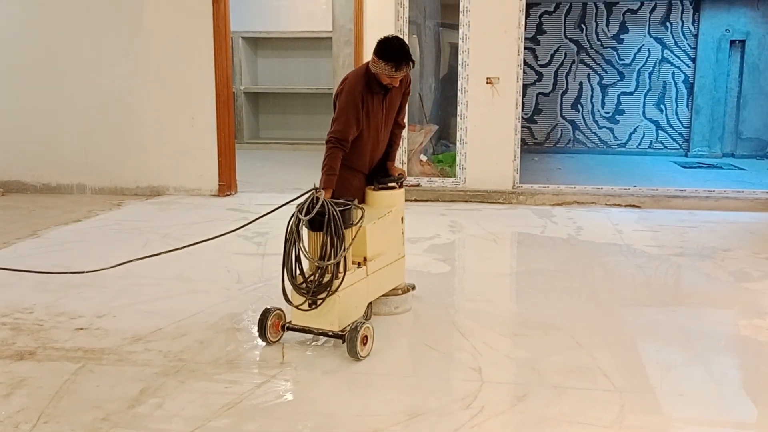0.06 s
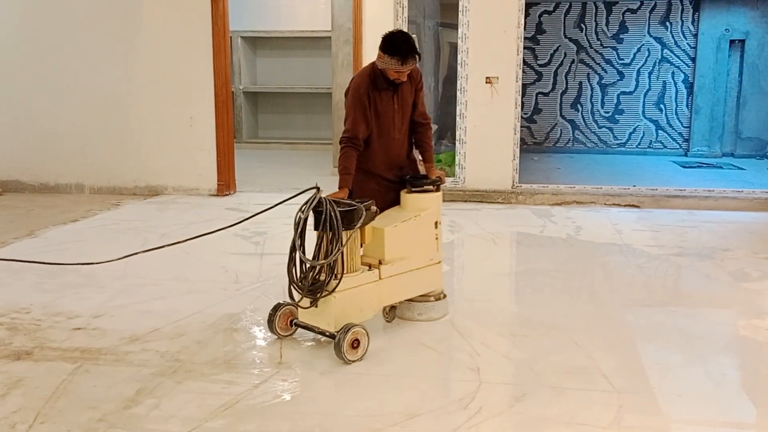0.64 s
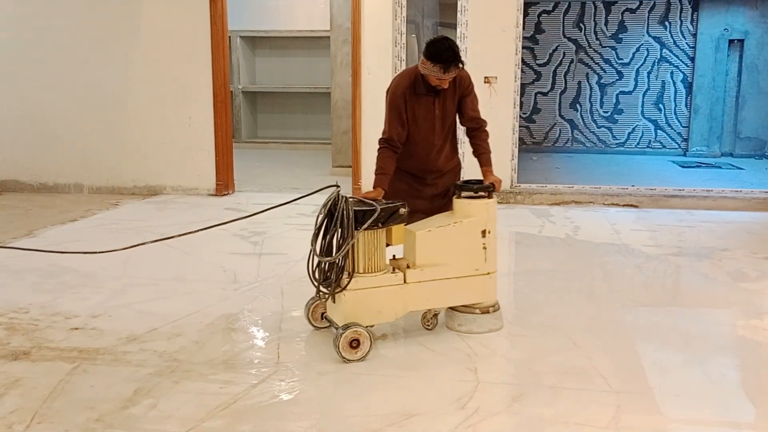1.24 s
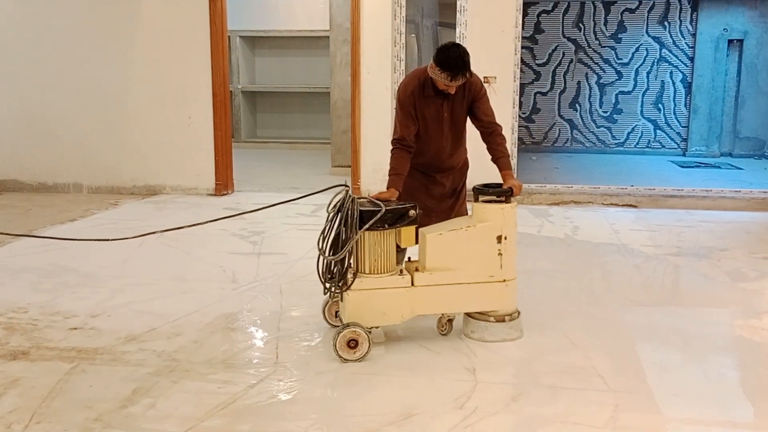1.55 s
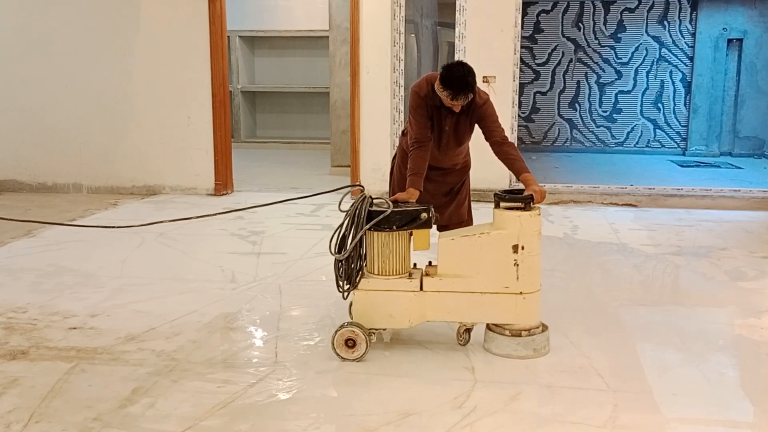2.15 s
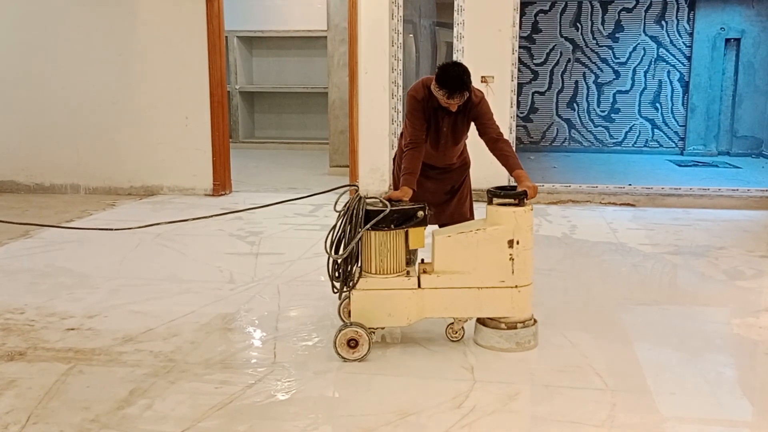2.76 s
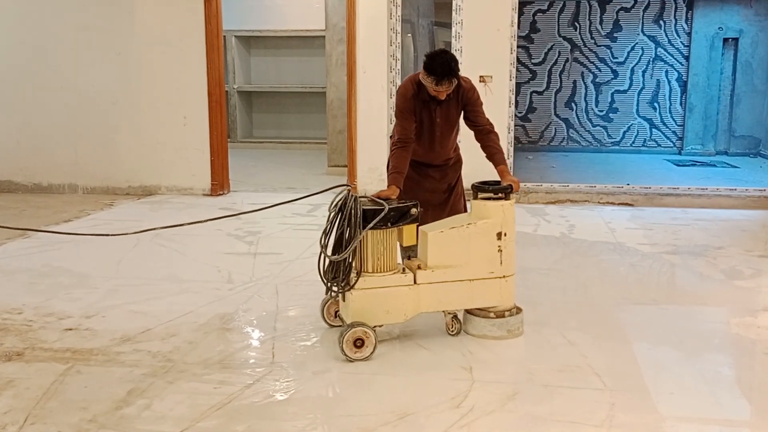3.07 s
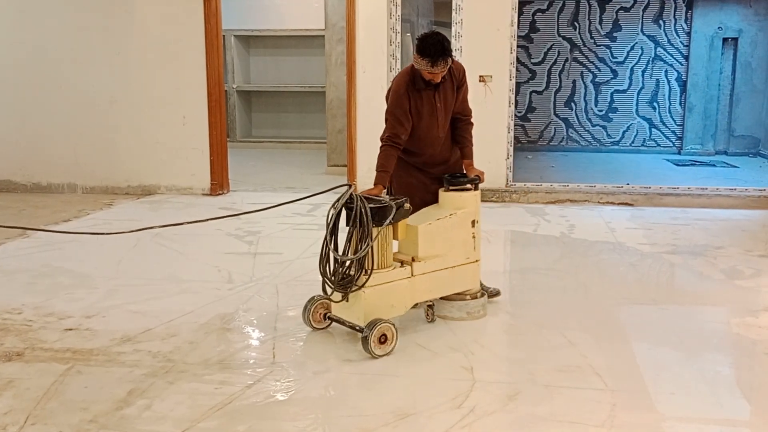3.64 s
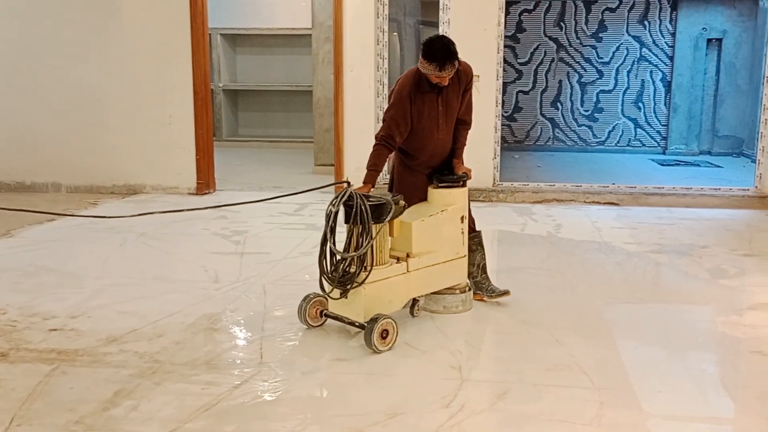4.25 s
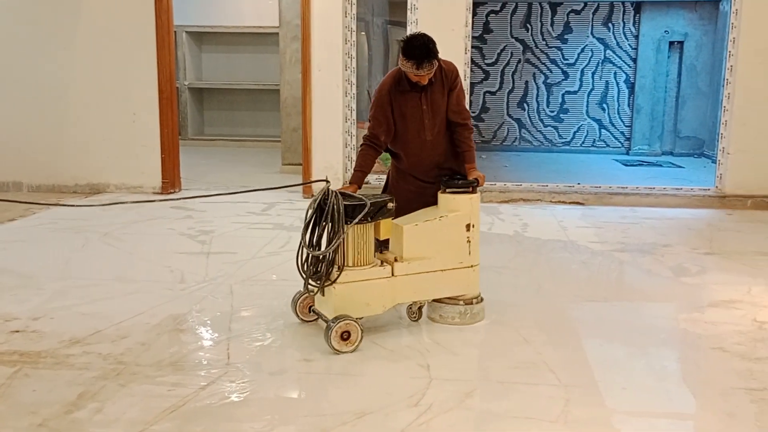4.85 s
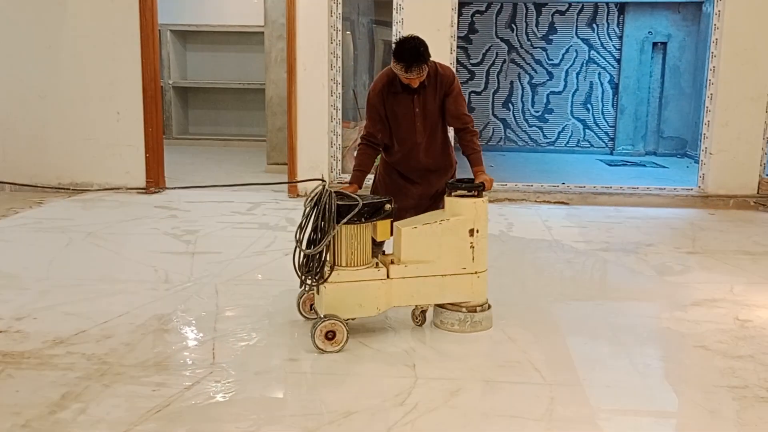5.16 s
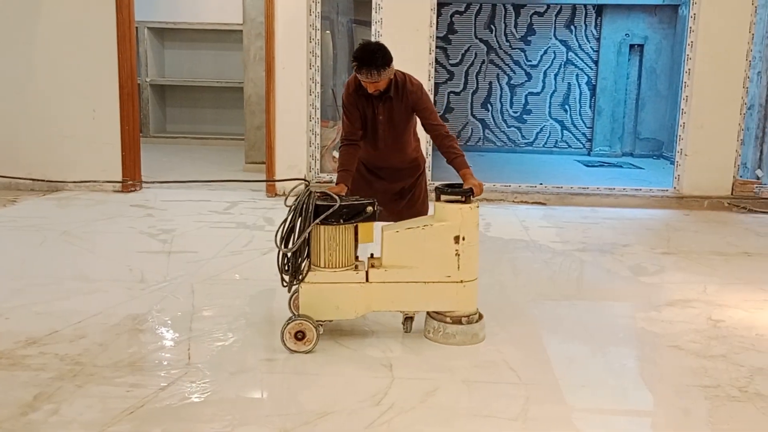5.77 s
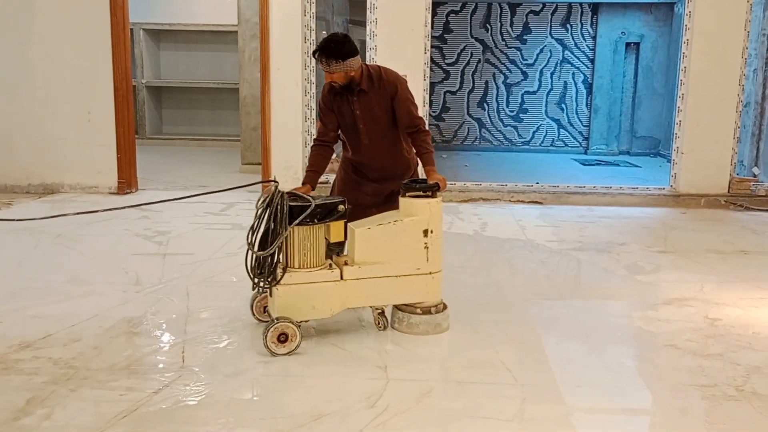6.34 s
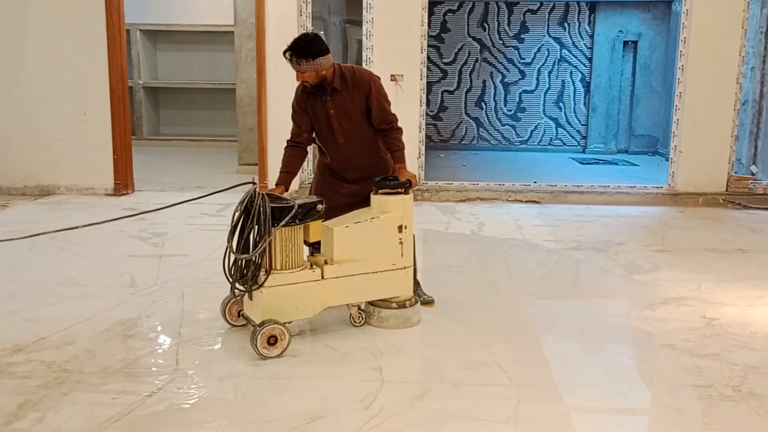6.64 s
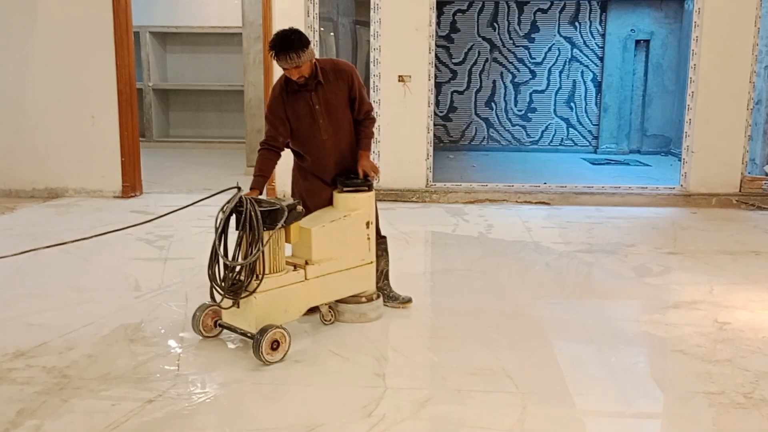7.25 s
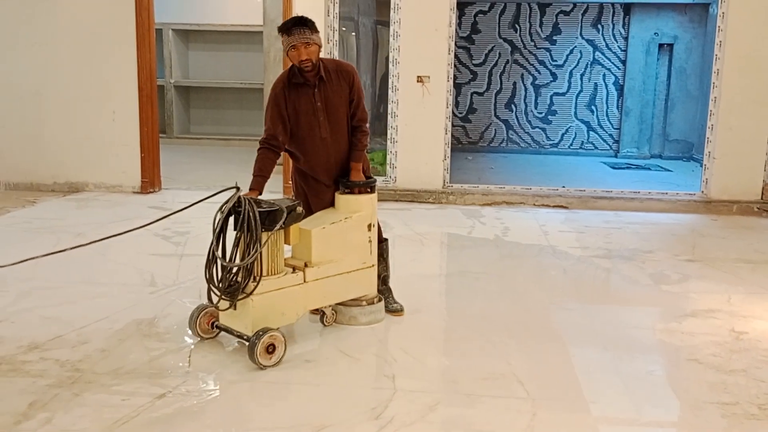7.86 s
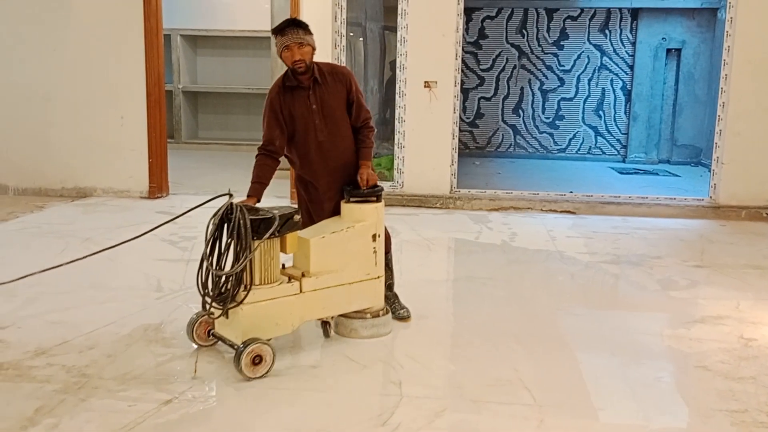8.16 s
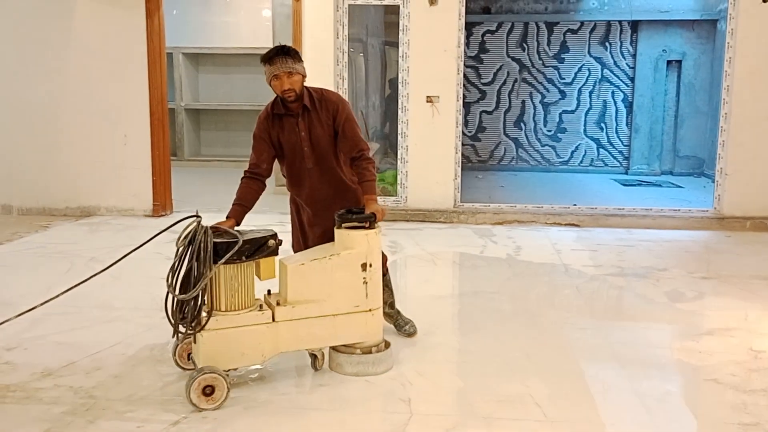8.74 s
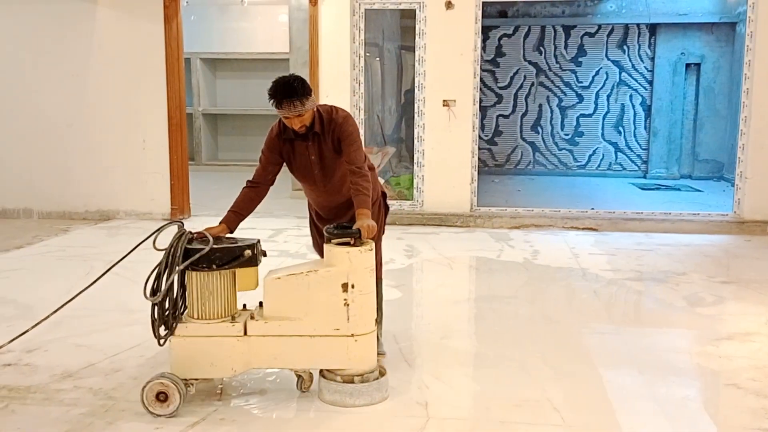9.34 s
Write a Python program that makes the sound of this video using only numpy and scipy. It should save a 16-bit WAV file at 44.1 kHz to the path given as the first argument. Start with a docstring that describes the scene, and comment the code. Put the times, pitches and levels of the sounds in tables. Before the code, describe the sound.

A heavy floor grinder drones and hums on wet stone, with a steady gritty rasp and a watery hiss.

```python
"""A heavy floor grinder is swung to and fro over wet stone in an empty building.
Stick-slip of the dragging stones shakes its sheet-steel casing into an uneven drone, and the belt
drive and gears hum at multiples of the shaft speed. Fracturing grit rubs, scrapes and rasps; the
slurry hisses. Now and then a stone catches and squeaks or rings. One microphone, a few metres away."""
import sys
import numpy as np
from scipy import signal
from scipy.fft import rfft, irfft
from scipy.io import wavfile
from scipy.ndimage import uniform_filter1d

SR = 44100
rng = np.random.default_rng(int(sys.argv[2]) if len(sys.argv) > 2 else 0)


def int16_out(signal):
    """Quantize to a 16-bit WAV file."""
    q = np.round(np.clip(np.atleast_2d(signal).T, -1, 1) * 32767)
    wavfile.write(sys.argv[1], SR, q.astype(np.int16))


N = 423360
TIME = np.arange(N) / SR
FREQS = np.maximum(np.fft.rfftfreq(N, 1 / SR), 1)


def from_db(db):
    """Decibels to gain."""
    return 10 ** (np.asarray(db) / 20)


def rms_one(x):
    """Scale to unit rms."""
    return x / np.sqrt(np.mean(x ** 2) + 1e-20)


def in_time(rows):
    """Interpolate each column of a timed curve to every sample."""
    times, *columns = np.transpose(rows)
    return [np.interp(TIME, times, column) for column in columns]


def bell(offset, half_width):
    """Gaussian of height 1, down to 1/e^2 at half_width."""
    return np.exp(-2 * (offset / half_width) ** 2)


def filtered(x, gain):
    """Apply a gain per frequency."""
    return irfft(rfft(x) * gain, N)


def coloured(x, spectrum):
    """Impose a spectrum, silent beyond its end points; rms 1."""
    hz, db = np.transpose(spectrum)
    gain_db = np.interp(np.log(FREQS), np.log(hz), db, left=-120, right=-120)
    return rms_one(filtered(x, from_db(gain_db)))


def resonate(x, modes):
    """Steep-sided resonances, each (Hz, width in Hz, relative dB); rms 1."""
    power = sum((from_db(db) / (1 + ((FREQS - hz ** 2 / FREQS) / width) ** 2)) ** 2
                for hz, width, db in modes)
    return rms_one(filtered(x, np.sqrt(power)))


def drift(rate_hz):
    """Smooth random wander; rms 1."""
    return rms_one(filtered(rng.standard_normal(N), 1 / (1 + (FREQS / rate_hz) ** 2)))


def grains(per_s, spread_db):
    """Grit fractures as random clicks of uneven size; rms 1."""
    born = rng.random(N) < per_s / SR
    sizes = from_db(spread_db * np.minimum(rng.exponential(1, N), 5))
    return rms_one(born * sizes * rng.choice([-1, 1], N))


def swells(starts, lengths, peaks_db, rest_db, attack_s=0.022, release_s=0.039):
    """Level in dB of a part that throbs under uneven grip and rises with each event."""
    coarse_time = TIME[::40]
    power = 0
    for start, length, db in zip(starts, lengths, peaks_db):
        end = start + length
        corners = [start - attack_s / 2, start + attack_s / 2, end - release_s / 2, end + release_s / 2]
        power += (from_db(db) * np.interp(coarse_time, np.sort(corners), [0, 1, 1, 0])) ** 2
    rest = from_db(rest_db + 2 * drift(rate_hz=43))
    return 10 * np.log10(rest ** 2 + np.interp(TIME, coarse_time, power))


def panel(part, level_db):
    """Stick-slip rattles a casing part; the harder it is shaken, the more its own note takes over."""
    note_hz, note_width_hz, rattle_hz, rattle_width_hz, share_db = part
    note = resonate(rng.standard_normal(N), [(note_hz, note_width_hz, 0)])
    note /= np.sqrt(uniform_filter1d(note ** 2, size=1400) + 0.038)  # friction sustains the swing
    rattle = resonate(grains(per_s=2500, spread_db=1.5), [(rattle_hz, rattle_width_hz, 0)])
    rattle /= np.sqrt(uniform_filter1d(rattle ** 2, size=2400) + 0.012)
    share = np.clip(from_db(share_db - 0.69 * (level_db - level_db.mean())), 0, 0.85)
    return from_db(level_db) * (np.sqrt(1 - share ** 2) * note + share * rattle)


# Casing parts. Each: note in Hz, its width in Hz, rattle in Hz, its width in Hz, rattle share in dB.
BOOM_PART = (142.5, 4.4, 147, 52, 1.3)
LOW_PART = (198, 6.2, 223, 71, 4.9)
LOOSE_PART = (266, 9, 256, 54, -6)
MAIN_PART = (303.5, 17, 326, 57, -2)
HIGH_PART = (405, 19.5, 392, 99, 2)
# Main panel at rest. Each row: time in seconds, level in dB.
DRONE_DB = [(0.0, -41), (2.75, -45.5), (4.81, -38), (5.91, -46), (6.09, -40), (8.53, -41.5), (8.58, -48),
            (8.62, -38.5), (9.6, -42.5)]
# Head stutters. Each row: start and length in seconds, boom and low panel levels in dB.
SHUDDER_EVENTS = [(0.21, 0.15, -42, -41.5), (0.47, 0.07, -48, -41.5), (0.693, 0.19, -49.5, -43),
                  (0.91, 0.11, -39.5, -43), (1.042, .06, -42, -45), (1.161, 0.043, -40.5, -32),
                  (1.26, 0.048, -49, -35.5), (1.435, 0.08, -43, -39.5), (1.81, 0.067, -39, -61),
                  (2.923, 0.18, -69, -43), (4.084, 0.1, -40.5, -48), (4.206, 0.049, -48, -44),
                  (4.327, 0.07, -36, -50), (4.424, .14, -33.5, -50), (4.57, 0.054, -52, -39.5),
                  (4.708, 0.18, -39, -47), (5, 0.14, -41, -41.5), (5.22, 0.088, -44, -46),
                  (5.503, 0.19, -66, -43), (5.868, 0.05, -42, -45), (6.01, 0.11, -43.5, -48),
                  (6.29, 0.047, -45, -41), (6.462, 0.11, -38.5, -52), (6.615, 0.12, -38.5, -48),
                  (7.503, 0.14, -66, -46), (7.728, 0.15, -47, -44.5), (8.134, 0.16, -74, -45.5),
                  (8.42, 0.13, -70, -42.5), (8.68, 0.17, -44.5, -57), (8.933, 0.058, -57, -39.5),
                  (9.088, 0.043, -40, -53), (9.39, 0.047, -44.5, -54)]
# Stone bites. Each row: start and length in seconds, loose, main and high panel levels in dB.
GROAN_EVENTS = [(0, 0.022, -34, -35, -47), (0.384, 0.038, -35, -36, -40), (0.453, 0.08, -42.5, -38, -49),
                (0.722, 0.13, -44, -35.0, -41), (0.912, 0.033, -54, -24.5, -40),
                (1.028, 0.16, -55, -34, -42), (1.29, 0.1, -52, -32.5, -50), (2.836, 0.27, -54, -40.5, -45),
                (3.587, 0.074, -59, -32, -57), (3.714, 0.083, -53, -32.5, -47),
                (4.196, 0.022, -39, -42, -39), (4.62, 0.22, -44, -37, -46), (5.065, 0.04, -49, -32, -58),
                (5.236, 0.03, -35, -33, -52), (5.286, 0.088, -37.5, -54, -58),
                (5.497, 0.27, -45.5, -55, -46), (5.9, 0.16, -38.5, -39, -40.5),
                (6.131, 0.031, -46, -33, -51), (6.783, 0.067, -62, -33, -63),
                (6.914, 0.022, -60, -29.5, -61), (6.972, 0.037, -60, -28.5, -58),
                (7.107, 0.023, -62, -32, -51), (7.46, 0.23, -41.5, -38.5, -41),
                (7.73, 0.19, -42, -41, -41.5), (8.085, 0.14, -32.5, -45, -37),
                (8.168, 0.071, -26.5, -24.5, -47), (8.25, 0.13, -38, -30, -34.5),
                (8.38, 0.085, -47, -34, -44), (8.488, 0.05, -38, -31, -35), (8.934, 0.13, -61, -57, -37)]
# Floor rumble. Each row: frequency in Hz, relative level in dB.
SLAB_SPECTRUM = [(15, -13), (45, -8), (62, -7), (78, 8), (105, 0), (135, 14), (200, -30)]


def casing():
    """The stuttering head shakes the big parts and the slab; biting stones make small panels groan."""
    drone_db, = in_time(DRONE_DB)
    starts, lengths, boom_peaks, low_peaks = np.transpose(SHUDDER_EVENTS)
    boom_db = swells(starts, lengths, boom_peaks, drone_db - 16)
    boom = panel(BOOM_PART, boom_db)
    low = panel(LOW_PART, swells(starts, lengths, low_peaks, drone_db - 16.5))
    starts, lengths, loose_peaks, main_peaks, high_peaks = np.transpose(GROAN_EVENTS)
    loose = panel(LOOSE_PART, swells(starts, lengths, loose_peaks, drone_db - 21))
    main = panel(MAIN_PART, swells(starts, lengths, main_peaks, drone_db))
    high = panel(HIGH_PART, swells(starts, lengths, high_peaks, drone_db - 9))
    slab_db = -71.5 + 0.76 * (boom_db - boom_db.mean())
    slab = from_db(slab_db) * coloured(rng.standard_normal(N), SLAB_SPECTRUM)
    return boom + low + loose + main + high + slab


# Belt and gear tones. Each row: multiple of shaft speed, level in dB.
DRIVE_TONES = [(8, -65), (9, -52), (20, -55.5), (34, -53), (35, -62)]
# Strongest gear whines. Each entry: multiple of shaft speed.
WHINE_ORDERS = (6, 12, 17, 22, 25)
# One curve per whine. Each row: time in seconds, level in dB.
WHINE_CURVES_DB = [
    [(0, -54.5), (2.3, -57), (2.55, -67), (4.0, -67), (6.7, -50.5), (6.85, -74), (7.7, -58), (8.2, -45.5),
     (8.5, -47), (8.7, -59)],
    [(0, -63), (1.05, -43.5), (1.55, -54), (2.15, -42), (2.55, -55), (3.0, -39), (3.55, -55.5), (4.6, -43),
     (5.0, -57), (5.95, -43.5), (7.25, -63.5), (7.85, -56), (8.3, -39), (8.7, -58), (9.0, -38.5),
     (9.55, -58)],
    [(0, -52), (0.3, -49), (1.9, -45), (2.5, -54), (3.7, -51.5), (4.5, -63), (5.5, -48), (6.5, -55),
     (6.9, -58), (8.65, -47), (9.55, -61)],
    [(0, -51), (0.35, -43), (0.75, -53), (2.05, -63), (2.35, -44.5), (3.0, -47), (3.35, -54), (3.7, -50),
     (4.8, -48), (5.9, -65), (6.5, -47), (7.7, -72), (8.2, -41.5), (8.75, -60), (9.55, -47)],
    [(0, -57), (8.4, -59), (8.8, -50.5), (9.6, -48)],
]


def drive(shaft_hz=33.25):
    """Tones follow a shaft that wavers under load; shifting echoes vary their level and phase."""
    shaft_turns = np.cumsum(shaft_hz * (1 + 0.00353 * drift(3.3))) / SR
    tones = [(order, db + 4.3 * drift(0.43)) for order, db in DRIVE_TONES]
    for order, curve in zip(WHINE_ORDERS, WHINE_CURVES_DB):
        tones.append((order, in_time(curve)[0] + 2.8 * drift(11)))
    hum = 0
    for order, db in tones:
        turns = order * shaft_turns + rng.random() + 0.14 * drift(5.5)
        hum += from_db(db) * np.sin(2 * np.pi * turns)
    return np.sqrt(2) * hum


def moving_echoes(x, echo_db, count=4):
    """Floor and wall paths change length as the machine swings, shifting a hollow ripple; rms 1."""
    delays_s = np.geomspace(0.004, 0.018, count) * rng.uniform(0.85, 1.15, count)
    echoes = sum(np.interp(TIME - delay - 0.001024 * drift(0.29), TIME, x, left=0, right=0)
                 for delay in delays_s)
    return rms_one(x + from_db(echo_db) * echoes)


# Coarse rub and fine rasp. Each row: frequency in Hz, relative level in dB.
RUB_SPECTRUM = [(290, -11), (380, 0.5), (450, 0.5), (505, -3.5), (590, -0.5), (650, 1), (750, -4),
                (790, -14.5), (880, -17)]
RASP_SPECTRUM = [(960, -44), (1060, -15.5), (1130, -3.5), (1340, -3), (1560, 0), (1880, -1.5), (2060, -4.5),
                 (2400, -3), (2700, -6), (2790, -4), (3000, -9.5), (3330, -9.5), (3950, -14.5), (5200, -44)]
# Pressure on the floor. Each row: time in seconds, rub level in dB, rasp level in dB.
PRESSURE_DB = [(0.0, -34.5, -33), (0.25, -36.5, -34), (0.6, -38.5, -32.5), (1.05, -35.5, -32),
               (1.6, -42, -33), (2.0, -39.5, -32), (2.48, -39, -34.5), (2.7, -41.5, -32), (2.9, -40, -34),
               (3.12, -40, -31), (3.5, -42.5, -32), (4.17, -40, -33), (4.35, -35, -31.5), (4.8, -37.5, -32),
               (5.4, -40.5, -32.6), (5.85, -41.5, -32.5), (6.3, -41, -31), (6.65, -40, -31.5),
               (6.95, -43, -31), (7.25, -42, -32.5), (7.68, -42.5, -34), (8.05, -43, -33),
               (8.4, -40, -32.5), (8.8, -41.5, -33.5), (9.05, -46, -33.5), (9.6, -45, -32)]
# Head resonances. Each row: frequency in Hz, width in Hz, relative level in dB.
HEAD_MODES = [(584, 46, -0.5), (637, 23, -3), (678, 18, -3), (720, 39, -0.5), (1123, 31, 1.5),
              (1153, 5.7, 5), (1572, 81, 1)]
STONE_MODES_HZ, STONE_WIDTH_HZ = (1426, 1537, 1656, 1760, 1857, 2324), 54


def grinding():
    """Under pressure, coarse grit rubs and rings the head; fine grit rasps and rings the stones."""
    rub_db, rasp_db = in_time(PRESSURE_DB)
    rub_gain = from_db(rub_db + 1.2 * drift(15))
    coarse = coloured(grains(per_s=4000, spread_db=0), RUB_SPECTRUM)
    rub = rub_gain * moving_echoes(coarse, echo_db=-7)
    head_db = -43 + 0.17 * (rub_db - rub_db.mean())
    head = from_db(head_db) * resonate(grains(per_s=4000, spread_db=3.5), HEAD_MODES)
    fine = coloured(grains(per_s=14000, spread_db=1.5), RASP_SPECTRUM)
    rasp = moving_echoes(fine, echo_db=-15)
    for hz in STONE_MODES_HZ:
        ring_gain = from_db(-23.5 + 5.5 * drift(4.1))
        rasp += ring_gain * resonate(grains(per_s=3000, spread_db=2), [(hz, STONE_WIDTH_HZ, 0)])
    return rub + head + from_db(rasp_db) * rasp


# Scrape colour. Each row: frequency in Hz, relative level in dB.
SCRAPE_SPECTRUM = [(690, -23), (780, 9), (818, -4), (832, 4.5), (841, 13), (852, 3), (868, 6.5), (886, 8),
                   (915, 5.5), (1000, 2), (1070, 8.5), (1250, -38)]
# Scrape strength. Each row: time in seconds, level in dB.
SCRAPE_DB = [(0.0, -46.5), (0.65, -45.5), (0.9, -44.5), (1.25, -47), (1.55, -53), (1.8, -46), (2.7, -45),
             (3.3, -45), (3.55, -42.5), (4.05, -45.5), (4.35, -43), (5.1, -44.5), (5.82, -46.5),
             (6.55, -45), (7.35, -42.5), (7.9, -45.5), (8.3, -48), (8.65, -44.5), (9.6, -45.5)]


def scrape():
    """Coarse grit grips unevenly: a fluttering midrange band."""
    level_db = in_time(SCRAPE_DB)[0] + 2.5 * drift(15)
    return from_db(level_db) * coloured(grains(per_s=4000, spread_db=-1), SCRAPE_SPECTRUM)


# Wet hiss and spray. Each row: frequency in Hz, relative level in dB.
HISS_SPECTRUM = [(4000, -28), (5400, -11), (6030, -11.5), (6180, -4.5), (6350, -6), (6800, -1), (7600, 0.5),
                 (7980, 0), (8300, 0.5), (8750, 0.5), (9250, -7.5), (10500, -35)]
SPRAY_SPECTRUM = [(8500, -39), (9400, -0.5), (9900, 4), (10700, -0.5), (11400, -5), (12200, -1.5),
                  (12950, 0), (13700, -8), (14050, -7), (15200, -1), (16000, 2)]
# Churned water. Each row: time in seconds, hiss level in dB, spray level in dB.
SLURRY_DB = [(0.0, -39, -45), (0.35, -41, -50.0), (1.05, -39, -46), (1.6, -41, -49.5), (2.35, -39.5, -47.5),
             (2.55, -39, -44), (3.05, -40, -48), (3.35, -38.5, -45.5), (3.9, -39, -46), (4.2, -40, -48),
             (5.5, -40, -48.5), (5.8, -39.5, -45.5), (6.3, -38.6, -47.0), (6.95, -39, -46.5),
             (7.6, -40, -46), (8.0, -40.5, -50.0), (9.0, -40.0, -47), (9.3, -39, -46), (9.6, -39, -46)]
# Wet stone sizzle. Each row: time in seconds, level in dB.
SIZZLE_DB = [(0, -50), (.9, -48), (1.6, -51), (3.8, -47), (4.4, -49.5), (5.5, -49), (5.9, -43.5),
             (7.35, -44.5), (8.0, -50), (9.6, -46)]
SQUEAK_HZ = 7990


def slurry(sweeps_per_s=12):
    """Stones sweep through water, which hisses and sprays; they sizzle at their squeak pitch."""
    hiss_db, spray_db = in_time(SLURRY_DB)
    hiss = from_db(hiss_db) * coloured(grains(per_s=20000, spread_db=2.1), HISS_SPECTRUM)
    spray = from_db(spray_db) * coloured(grains(per_s=32000, spread_db=3.5), SPRAY_SPECTRUM)
    sizzle = resonate(grains(per_s=1500, spread_db=3.5), [(SQUEAK_HZ, 420, 0), (SQUEAK_HZ, 70, -2)])
    sizzle *= from_db(in_time(SIZZLE_DB)[0] + 1.3 * drift(32))  # small flares
    sweep_db = 0.34 * np.sin(2 * np.pi * np.cumsum(sweeps_per_s + 0.29 * drift(1.5)) / SR)
    water = (hiss + sizzle) * from_db(0.5 * drift(15)) + spray * from_db(0.59 * drift(16))
    return water * from_db(sweep_db)


def hall(x, wet_db, t60_s=0.61):
    """Bare walls add a dense, decaying tail."""
    t = TIME[:int(1.5 * SR)]
    tail = rng.standard_normal(len(t)) * from_db(-60 * t / t60_s) * (t > 0.008)
    return x + from_db(wet_db) * signal.fftconvolve(x, tail / np.linalg.norm(tail))[:N]


# Stone squeaks. Each row: peak time in seconds, level in dB, half-width in seconds.
SQUEAK_EVENTS = [(.345, -38, .026), (0.647, -43, .03), (0.836, -32, 0.015), (3.762, -33, 0.019),
                 (3.85, -49, .06)]


def squeaks():
    """A stone catches and sings briefly; the hall carries the note on."""
    catches = sum(from_db(db) * bell(TIME - peak_s, width_s) for peak_s, db, width_s in SQUEAK_EVENTS)
    note = np.sqrt(2) * np.sin(2 * np.pi * np.cumsum(SQUEAK_HZ + 35 * drift(157)) / SR)
    return hall(note * catches, wet_db=-3)


# Echo cancellations. Each row: peak time and half-width in seconds, centre in Hz, dip in dB,
# glide in octaves per second.
HOLLOW_EVENTS = [(.65, 0.13, 810, -6, 0), (1.557, 0.12, 950, -2, -2), (3.194, 0.14, 740, -10, 9),
                 (5.82, 0.11, 880, -12, 0), (6.05, .14, 1080, -4.5, -1), (6.78, 0.064, 580, -18, -5),
                 (6.97, 0.053, 567, -7, -6), (7.348, 0.078, 510, -10, 2), (7.68, 0.099, 705, -16, 3),
                 (8.256, 0.19, 940, -8, -3), (8.577, 0.042, 420, -8, 5)]


def hollowed(x, half_width_octaves=0.42):
    """The floor's echo cancels a midrange band: a dip opens, glides and closes."""
    hz, t, spectra = signal.stft(x, SR, nperseg=1024)
    octave = np.log2(np.maximum(hz, 1))[:, None]
    dips_db = 0
    for peak_s, width_s, centre_hz, db, glide in HOLLOW_EVENTS:
        centre_octave = np.log2(centre_hz) + glide * (t - peak_s)
        dips_db += db * bell(t - peak_s, width_s) * bell(octave - centre_octave, half_width_octaves)
    return signal.istft(spectra * from_db(dips_db), SR)[1][:N]


# Stone grips. Each row: peak time and half-width in seconds, pitch in Hz, level in dB.
RING_EVENTS = [(1.1, 0.47, 885, -44.5), (1.87, .06, 2920, -46), (3.07, .07, 1510, -35),
               (3.47, 0.091, 2590, -40), (4.02, 0.16, 2560, -40), (8.45, 0.082, 1766, -38)]


def stone_rings():
    """A gripping stone swells into a rough note and fades."""
    waver_hz = 28 * drift(59.2)
    rings = 0
    for peak_s, width_s, hz, db in RING_EVENTS:
        note = np.sqrt(2) * np.sin(2 * np.pi * np.cumsum(hz + waver_hz) / SR)
        rings += from_db(db) * bell(TIME - peak_s, width_s) * note
    return rings


def scene():
    """The whole machine, the same in both channels."""
    machine = casing() + drive() + hollowed(grinding() + scrape()) + slurry() + squeaks() + stone_rings()
    return np.array([machine, machine])


def record(dry):
    """A deep notch parts the rasp from the hiss; the top is cut steeply."""
    notch_hz, notch_width_hz, notch_db, cutoff_hz = 4793, 342, -49, 15550
    notch = from_db(notch_db * np.exp(-((FREQS - notch_hz) / notch_width_hz) ** 2))
    lowpass = np.clip((cutoff_hz - FREQS) / 80, 0, 1)
    return filtered(dry, notch * lowpass)


dry = scene()
out = record(dry)
int16_out(out)
```